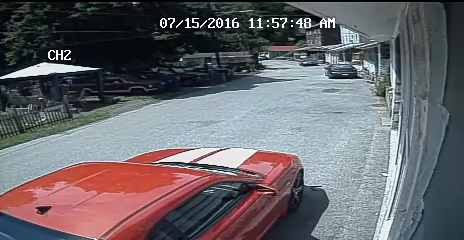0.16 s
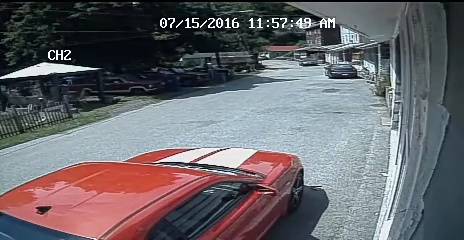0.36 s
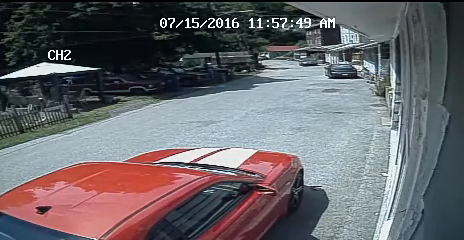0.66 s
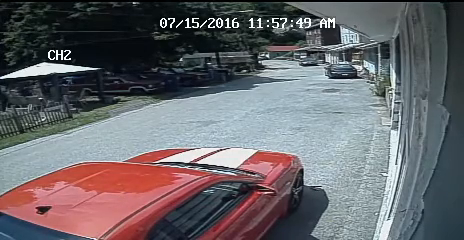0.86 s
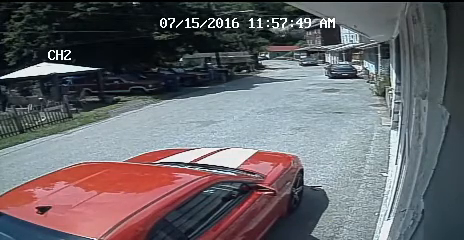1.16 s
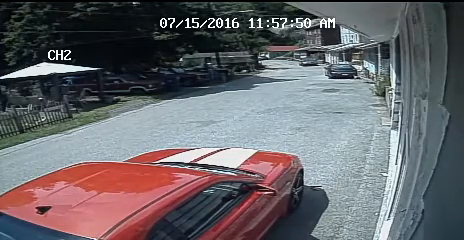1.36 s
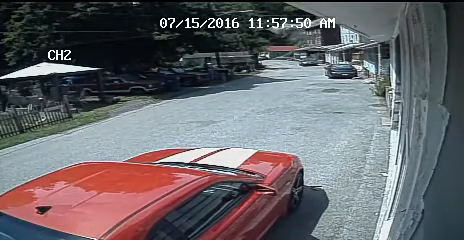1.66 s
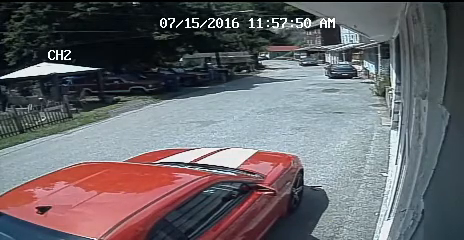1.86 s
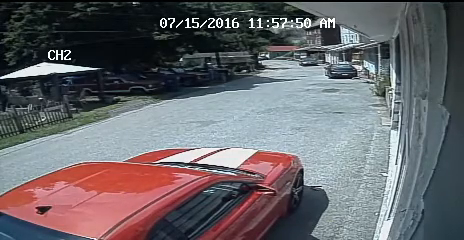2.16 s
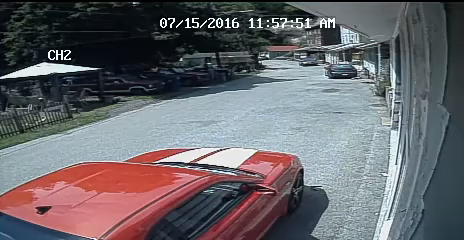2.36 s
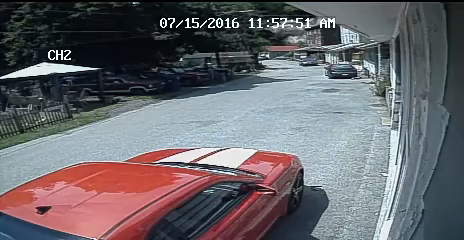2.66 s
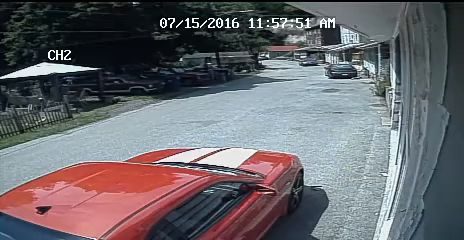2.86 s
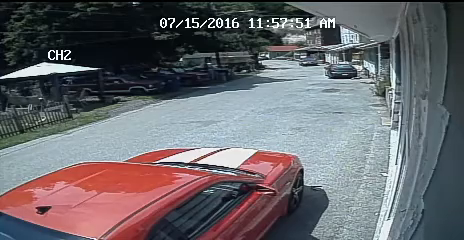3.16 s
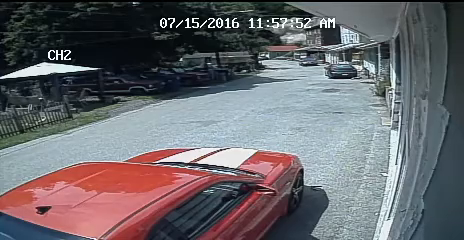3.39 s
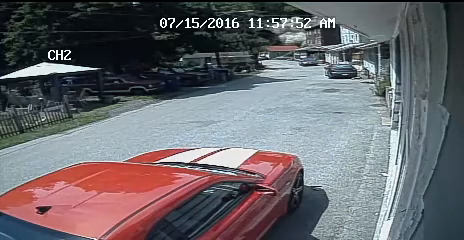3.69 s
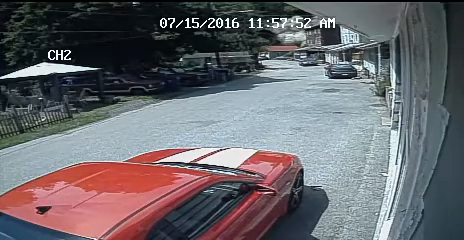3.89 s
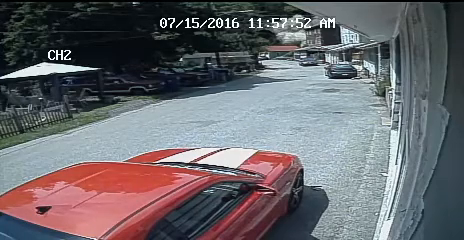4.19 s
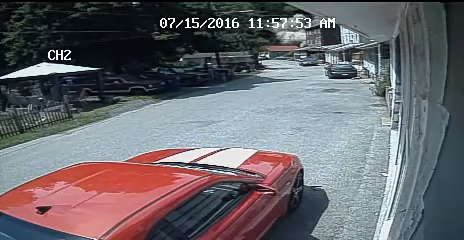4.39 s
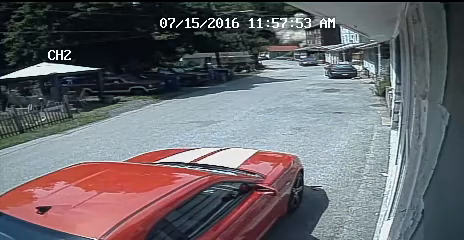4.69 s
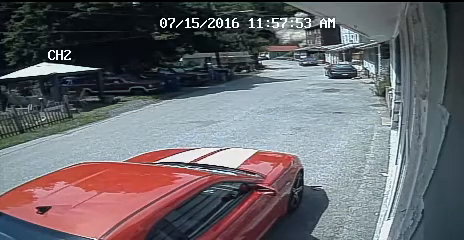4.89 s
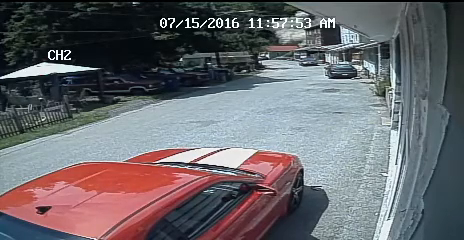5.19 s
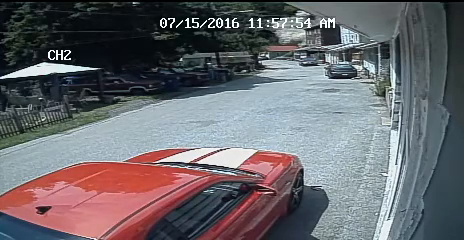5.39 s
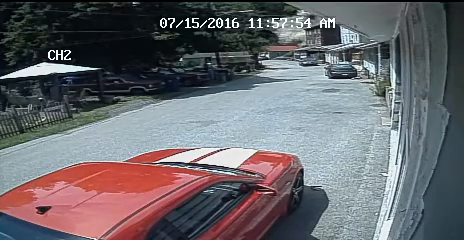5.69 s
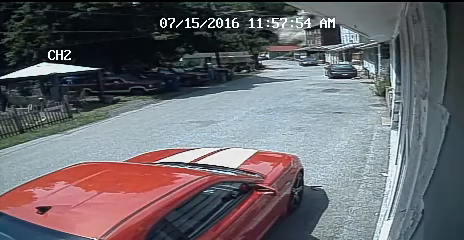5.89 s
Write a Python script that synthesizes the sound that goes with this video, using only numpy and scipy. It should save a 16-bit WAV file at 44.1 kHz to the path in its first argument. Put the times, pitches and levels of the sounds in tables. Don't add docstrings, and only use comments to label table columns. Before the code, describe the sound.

A quiet yard with distant traffic, leaves, a faint drone and tiny bird chips. Just before half a second a thump leads into a huge explosion that jams a cheap outdoor microphone, sputtering and tearing. The roar breaks into crackles and rolling echoes, boards and tiles knock down far off, and a bird chips near the end.

```python
import sys
import numpy as np
from scipy import signal
from scipy.fft import rfft, irfft
from scipy.io import wavfile
from scipy.ndimage import uniform_filter1d

SR = 44100
rng = np.random.default_rng(int(sys.argv[2]) if len(sys.argv) > 2 else 0)


def volts_from_db(level):
    exponent = np.asarray(level, float) / 20
    return 10 ** exponent


def output_pcm(signal):
    pcm = np.clip(np.atleast_2d(signal).T, -1, 1) * 32767
    wavfile.write(sys.argv[1], SR, np.round(pcm).astype(np.int16))


N = 266584
RAIL = 0.31

# freq_hz, level_db (per Hz)
HOUSING = [(530, -25.5), (900, -4.5), (958, -1.5), (1050, -1), (1250, -0.5), (1580, -7), (2090, -1),
           (2200, -4.5), (2410, -13), (2910, -3.5), (3340, -12), (3730, -5.5), (4000, -3.5), (5200, -51),
           (8800, -120)]
# time_s, level_db, standing overpressure_rails
ROAR_COURSE = [(0, -62, 0), (.3, -52.5, 0), (.41, -52.5, 0), (.455, -25.5, 0), (.47, -2.5, 3), (.58, .5, 3),
               (.635, 2, -.4), (.655, -2, 1), (.9, 2.5, 2.5), (1.05, 4.5, 2.5), (1.12, -3, 0.2),
               (1.38, -3.5, .4), (1.65, -7.5, 1.09), (2.2, -8, 0.93), (2.45, -11.5, 0.46), (3.0, -18.5, 0),
               (5.1, -39.5, 0), (6.04, -45, 0)]


def noise(spectrum, lo_hz, hi_hz):
    hz, db = np.transpose(spectrum)
    f = np.fft.rfftfreq(N, 1 / SR) + 1e-3
    colour = volts_from_db(np.interp(np.log(f), np.log(hz), db))
    edges = np.sqrt((1 + (lo_hz / f) ** 6) * (1 + (f / hi_hz) ** 6))
    x = irfft(rfft(rng.standard_normal(N)) * colour / edges, N)
    return x / np.std(x)


def walk(rate_hz):
    k = int(SR / rate_hz)
    steps = np.repeat(rng.standard_normal(N // k + 1), k)
    return 0.75 * uniform_filter1d(uniform_filter1d(steps, k), k)[:N]


def lag(x, seconds):
    keep = np.exp(-1 / (seconds * SR))
    return signal.lfilter([1 - keep], [1, -keep], x)


def hold(t, corners_s):
    return np.interp(t, corners_s, [0, 1, 1, 0])


def scatter(span, size, count):
    luck = rng.random((count, 2))
    moments = span[0] + (span[1] - span[0]) * (np.arange(count) + luck[:, 0]) / count
    sizes = size[0] + (size[1] - size[0]) * luck[:, 1]
    return np.c_[moments, sizes]


def yard(t):
    # freq_hz, level_db (per Hz)
    traffic_colour = [(12, -31), (20, -2), (32, -23), (76, -7), (114, -19.5), (248, -6.5), (277, -22),
                      (369, -12), (900, -34.5), (1170, -48.5), (1980, -120)]
    # freq_hz, level_db (per Hz)
    leaf_colour = [(350, -30), (600, -0.5), (811, -7), (1010, -8), (1230, -12), (1350, -14), (1470, -17.5),
                   (2040, -19.5), (2430, -25), (3030, -19.5), (4000, -18.5), (5200, -51.5), (8800, -120)]
    # pitch_hz, width_hz, level_db
    hum = [
        (254.4, 16, -49.5),
        (359, 13, -55.5),
        (480, 10, -53),
    ]
    traffic = volts_from_db(1.6 * walk(2.5)) * noise(traffic_colour, 12, 700)
    leaves = volts_from_db(-7.0 + 1.0 * walk(17)) * noise(leaf_colour, 600, 5000)
    drone = np.zeros(N)
    for hz, width_hz, db in hum:
        wavering_hz = hz + 0.15 * width_hz * walk(8)
        drone += volts_from_db(db + 1.5 * walk(5.9)) * np.sin(2 * np.pi * np.cumsum(wavering_hz) / SR)
    return volts_from_db(-41.0) * (traffic + leaves) + drone


def bird():
    # start_s, peak_db, start_hz, fall_hz, t60_s
    chips = [
        (.127, -43, 3950, 60, 0.09),
        (.185, -47, 3820, 60, 0.063),
        (0.209, -46, 3880, 59.6, 0.085),
        (5.453, -38, 3820, 169, 0.33),
    ]
    out, age = np.zeros(N), np.arange(int(0.2 * SR)) / SR
    rough = volts_from_db(4.3 * walk(150))
    scratch = noise([(3000, -20), (3800, 2), (4400, -4)], 2800, 4100)
    for s, db, hz, fall_hz, t60 in chips:
        i = int(s * SR)
        span = slice(i, i + len(age))
        falling_hz = hz - fall_hz * age / 0.061
        tone = np.sin(2 * np.pi * np.cumsum(falling_hz) / SR) * rough[span]
        envelope = volts_from_db(db - 60 * age / t60) * np.minimum(age / 0.0031, 1)
        out[span] += envelope * (tone + 1.25 * scratch[span])
    return out


def debris():
    # start_s, peak_db, ring_hz
    landings = [(2.881, -14.5, 984), (2.967, -13, 961), (3.019, -18.5, 527), (3.129, -6.5, 2860),
                (3.163, -2.5, 526), (3.219, -11, 570), (3.269, -21.5, 640), (3.329, -24, 972),
                (3.399, -7, 2110), (3.51, -7.5, 1100), (3.579, -17, 530), (3.759, -11, 2110),
                (3.929, -14, 650), (4.018, -15, 514), (4.043, -7.5, 715), (4.069, -22, 678),
                (4.103, -12, 1380), (4.149, -14, 550), (4.309, -27, 1130), (4.447, -16.5, 920),
                (4.463, -16, 1105), (4.581, -14.5, 2950), (4.679, -16.5, 790), (4.769, -26, 503)]
    out, age = np.zeros(N), np.arange(int(0.09 * SR)) / SR
    splinters = noise(HOUSING, 500, 5500)
    for s, db, hz in landings:
        i = int(s * SR)
        span = slice(i, i + len(age))
        ring = np.sin(2 * np.pi * hz * age) * np.exp(-age / 0.0051)
        smear = np.exp(-age / 0.007) + 0.35 * np.exp(-age / 0.044)
        burst = 0.34 * splinters[span] * smear
        out[span] += volts_from_db(db - 5) * (ring + burst) * np.minimum(age / 0.0017, 1)
    return out


def held_crests(t):
    # start_s, length_ms
    crests = [(0.4732, 9.6), (0.4882, 6.9), (0.5169, 9.5), (0.5307, 5.9), (0.5458, 6.2), (0.5699, 26),
              (0.633, 16.3), (0.6675, 4.5), (0.6835, 11.6), (0.7135, 18.8), (0.7362, 13.5), (0.7558, 15.2),
              (0.7829, 9.3), (0.801, 8.5), (0.8728, 6.9), (0.8916, 9), (0.9583, 6.6), (1.0326, 6.7),
              (1.0681, 9.6), (1.0857, 7.9), (1.1161, 14.6), (1.1373, 11.1), (1.1779, 13.1), (1.2265, 11.4),
              (1.2988, 9.6), (1.3526, 9.4), (1.3631, 9.7), (1.3969, 9.2), (1.4165, 10.4), (1.4632, 6.7)]
    flutter = scatter((0.82, 1.55), (3.8, 5.6), count=14)
    push = np.zeros(N)
    for s, ms in [*crests, *flutter]:
        span = slice(int(s * SR), int((s + ms / 1000 - 0.0004) * SR))
        push[span] += 0.22 * min(ms, 12) ** 2 * np.minimum((t[span] - s) / 0.003, 1)
    return push


def swings(t):
    # middle_s, length_ms, push_rails
    ground = [
        (.424, 10, .2),
        (.4335, 7, -.45),
        (.4395, 8, .8),
        (.4475, 10, -.55),
        (.455, 6, 1.1),
        (.4608, 6.5, -8.0),
    ]
    # middle_s, length_ms, push_rails
    blast = [(0.4674, 4.8, 12.5), (.485, 7.3, -6.5), (0.495, 4.1, -8.5), (0.507, 2.1, -12),
             (0.543, 10.5, -8.5), (0.558, 4.4, -2.5), (.704, 5.8, -6.5), (0.708, 3, -8), (0.734, 7.1, 5.5),
             (0.752, 4.6, -8.5), (1.132, 2.6, -6.5), (1.363, 1.3, -4.5)]
    # time_s, tick_db
    ticks = [(1.5683, -27.5), (1.6104, -33), (1.632, -30), (1.672, -29.5), (1.7068, -30.5), (1.8094, -34),
             (1.8262, -27.5), (1.9178, -33), (1.9936, -34), (2.0231, -31.5), (2.042, -33), (2.0632, -32),
             (2.087, -30), (2.1406, -36.5), (2.1868, -30), (2.2477, -35.5), (2.3438, -32), (2.4092, -38.5),
             (2.511, -45)]
    fainter = scatter((1.49, 2.42), (-45, -37), count=20)
    troughs = [(s + 0.0006, 1.8, -4.2 * volts_from_db((db + 40.0) / 4)) for s, db in [*ticks, *fainter]]
    push = np.zeros(N)
    for s, ms, height in [*ground, *blast, *troughs]:
        span = slice(int((s - ms / 2000) * SR), int((s + ms / 2000) * SR))
        push[span] += height * np.cos(np.pi * (t[span] - s) * 1000 / ms) ** 2
    return push


def pressure(t):
    standing = np.interp(t, *np.transpose(ROAR_COURSE)[::2])
    return RAIL * uniform_filter1d(standing + held_crests(t) + swings(t), size=20)


def roar(t):
    # freq_hz, level_db (per Hz)
    blast_colour = [(12, -24), (20, 7), (81, -7), (114, -3.5), (260, -3), (300, 0), (595, -9.5),
                    (900, -9.5), (1170, -44.5), (1980, -120)]
    # middle_s, half_length_s, whole_roar_db, extra_rumble_db, extra_throb_db
    echoes = [(1.777, 0.048, -2, -4, 0), (2.1, 0.24, 1, 0, 0), (2.7, 0.22, -1, 0.5, 5),
              (3.18, 0.13, .5, 6, 10.5), (3.49, .12, -0.5, -1, 10.5), (3.93, 0.21, -1, -1, 11),
              (4.157, 0.16, 3.5, -9, -2), (4.52, .15, 2, -5, 19), (4.856, .4, -1.9, 3, 22),
              (5.268, .08, 2, 2, -5), (5.5, 0.098, 1.5, 5, 7), (5.765, 0.038, 3.5, -3, 3)]
    echo_db = np.zeros((3, N))
    for s, half_s, *more_db in echoes:
        echo_db += np.outer(more_db, np.maximum(1 - np.abs(t - s) / half_s, 0))
    lull_db = -15 * hold(t, (0.565, 0.597, 0.637, 0.655))
    muffle_db = -8 * hold(t, (0.66, 1.05, 1.4, 1.65))
    dull_db = np.interp(t, (4.86, 5.66), [0, -5.5])
    body_db = np.interp(t, *np.transpose(ROAR_COURSE)[:2]) + lull_db + echo_db[0]
    crackle_db = body_db - 1.5 + muffle_db + dull_db
    rumble_db = body_db - 7.5 + echo_db[1]
    throb_db = body_db - 13 + np.interp(t, (1.4, 3.2), [0, -8.5]) + echo_db[2]
    lumps = 1.4 * walk(14) + 0.73 * walk(45)
    body = volts_from_db(body_db + lumps + 0.49 * walk(16)) * noise(blast_colour, 150, 780)
    crackle = volts_from_db(crackle_db + 0.94 * lumps + 1.0 * walk(120)) * noise(HOUSING, 700, 5400)
    rumble = volts_from_db(rumble_db + 2.2 * lumps + 2.7 * walk(2.9)) * noise(blast_colour, 50, 150)
    throb = volts_from_db(throb_db - 2.5 + 1.9 * walk(3.4)) * noise(blast_colour, 25, 50)
    return body + crackle + rumble + throb


def scene():
    t = np.arange(N) / SR
    return (yard(t) + bird() + debris() + pressure(t) + roar(t))[None]


def preamp(x):
    knee, low_rail, slew_hz = 0.07, -2.2, 2230
    bent = np.maximum(RAIL - knee * np.logaddexp(0, (RAIL - x) / knee), low_rail)
    excess_rails = np.maximum(x - RAIL, 0) / RAIL
    bias = 0.42 * lag(np.tanh(excess_rails / 4.0) ** 2, 0.15)
    slewed = lag(bent, 1 / (2 * np.pi * slew_hz))
    fast_s, slow_s, fast_share = 0.013, 0.25, 0.8
    drained = fast_share * lag(slewed, fast_s) + (1 - fast_share) * lag(slewed, slow_s)
    return slewed - drained + bias + 0.02


def telephone_converter(x):
    line_hz, full_scale = 8000, 0.69
    guard = signal.firwin(441 * 64 + 1, 3960, window=("kaiser", 5), fs=80 * SR)
    line = np.clip(signal.resample_poly(x, 80, 441, window=guard) / full_scale, -1, 1)
    code = np.round(127 * np.log1p(255 * np.abs(line)) / np.log(256)) / 127
    line = full_scale * np.sign(line) * np.expm1(code * np.log(256)) / 255
    taps = signal.firwin(441 * 32 + 1, 3960, window=("kaiser", 9), fs=441 * line_hz)
    return np.pad(signal.resample_poly(line, 441, 80, window=taps), (0, 441))[:N]


def band_limit(x):
    return signal.sosfilt(signal.butter(12, 15800, fs=SR, output="sos"), x)


def record(dry):
    wide = telephone_converter(preamp(dry[0]))
    ceiling = 0.71
    return band_limit(np.clip(wide, -ceiling, ceiling)[None])


dry = scene()
out = record(dry)
output_pcm(out)
```